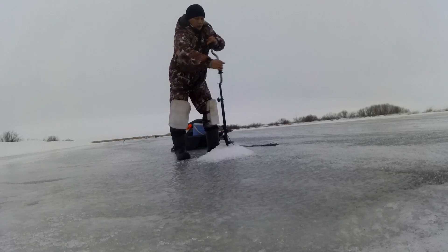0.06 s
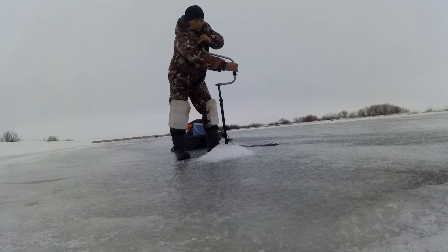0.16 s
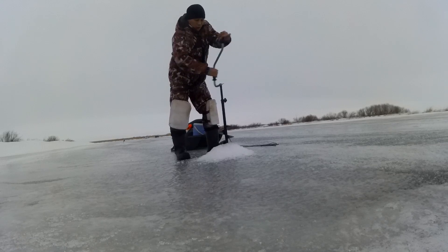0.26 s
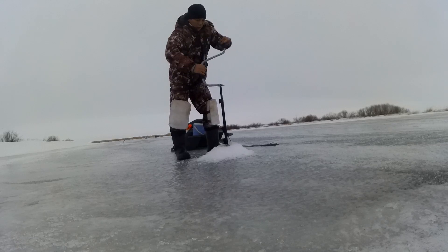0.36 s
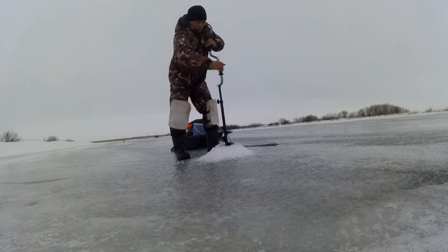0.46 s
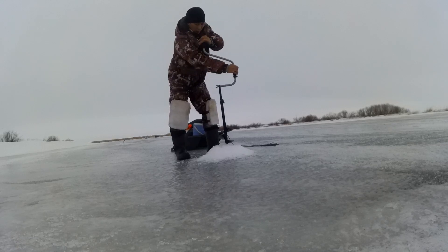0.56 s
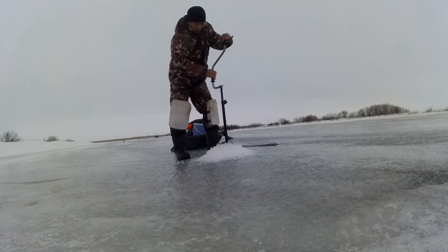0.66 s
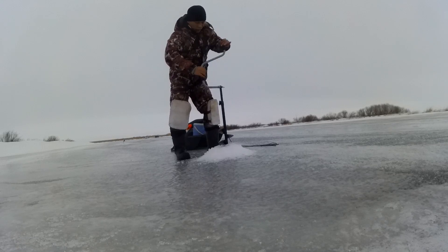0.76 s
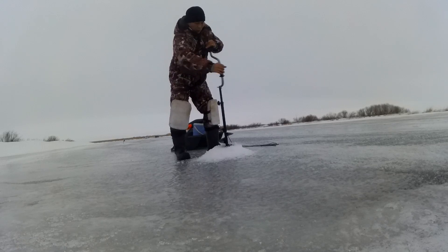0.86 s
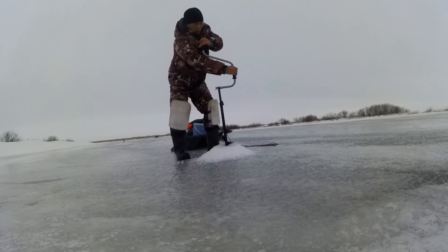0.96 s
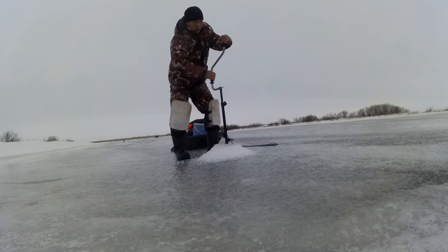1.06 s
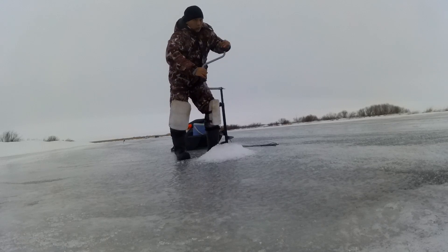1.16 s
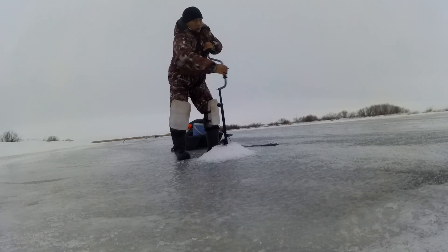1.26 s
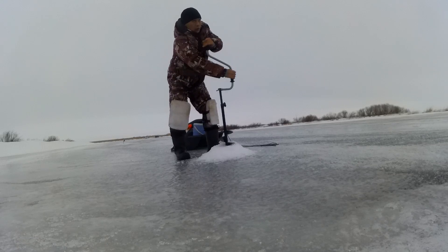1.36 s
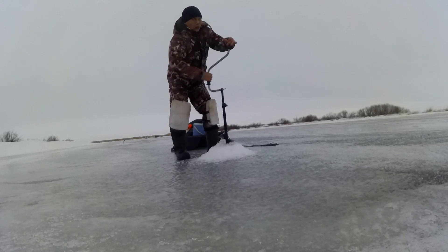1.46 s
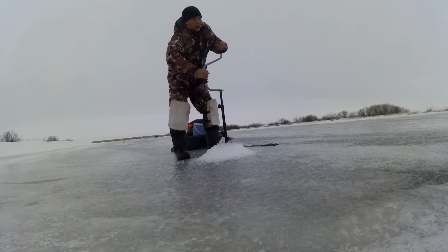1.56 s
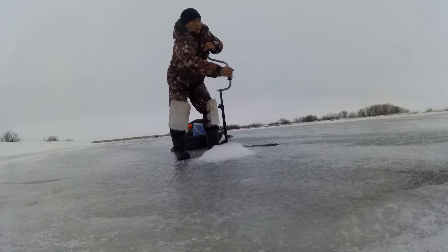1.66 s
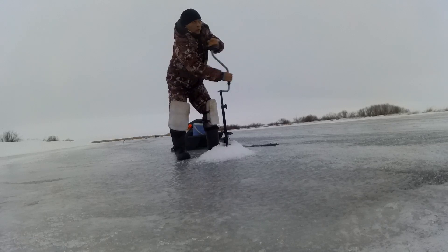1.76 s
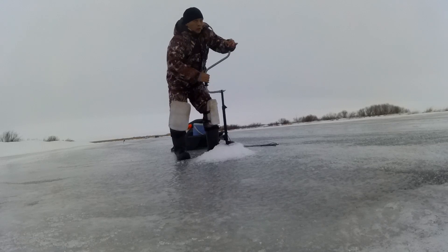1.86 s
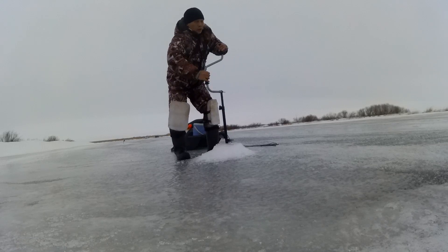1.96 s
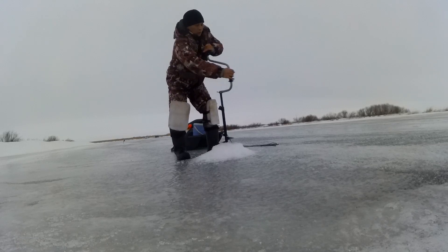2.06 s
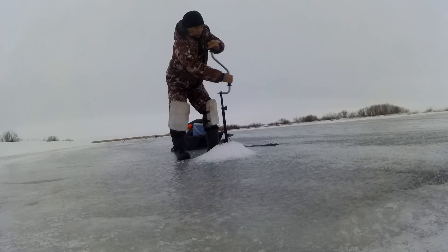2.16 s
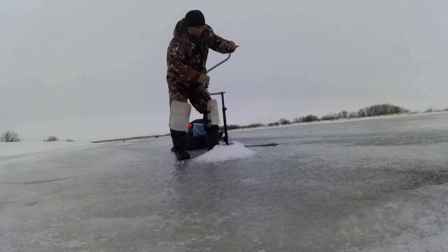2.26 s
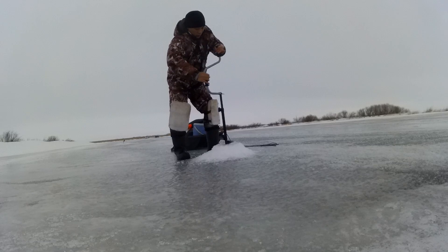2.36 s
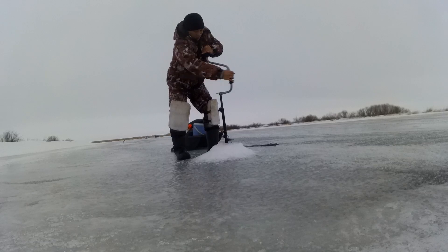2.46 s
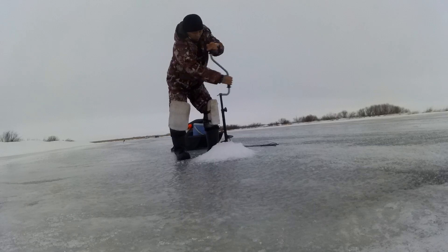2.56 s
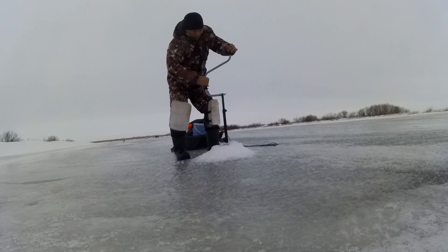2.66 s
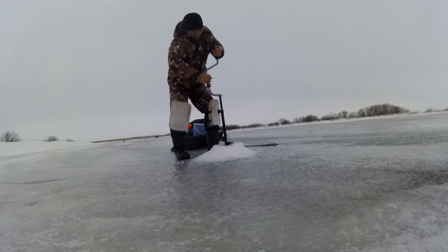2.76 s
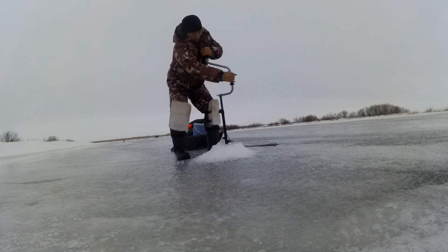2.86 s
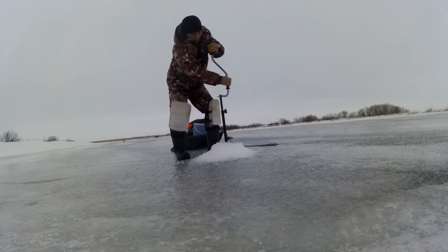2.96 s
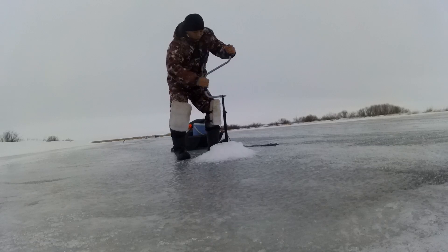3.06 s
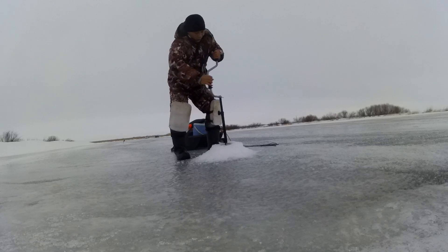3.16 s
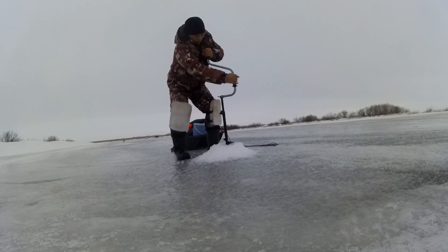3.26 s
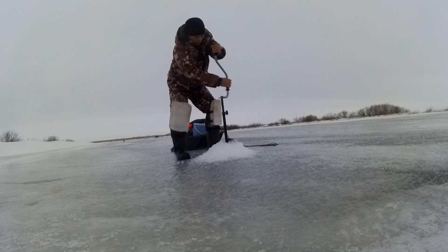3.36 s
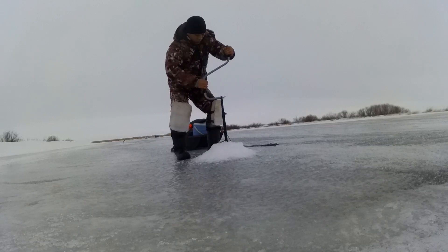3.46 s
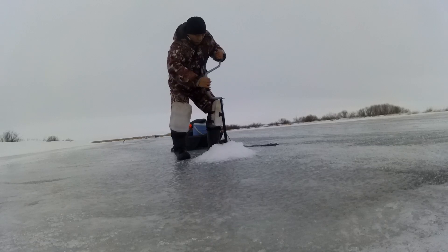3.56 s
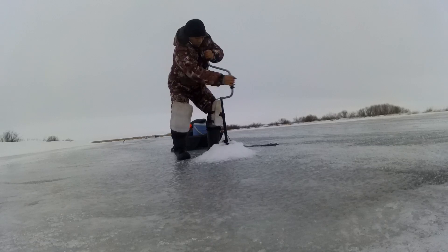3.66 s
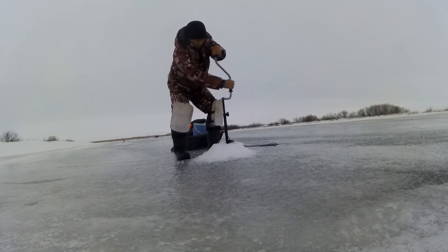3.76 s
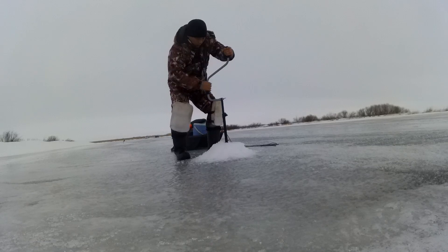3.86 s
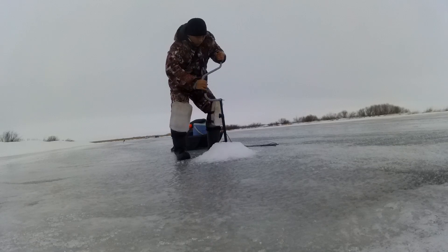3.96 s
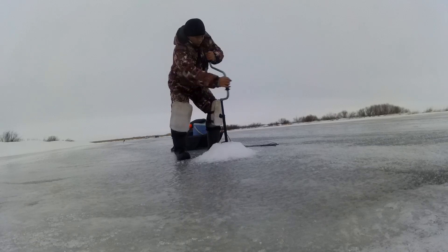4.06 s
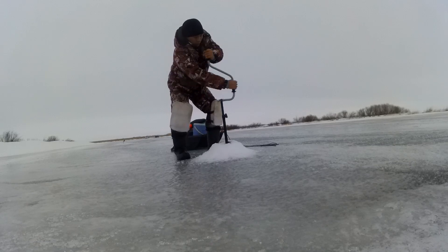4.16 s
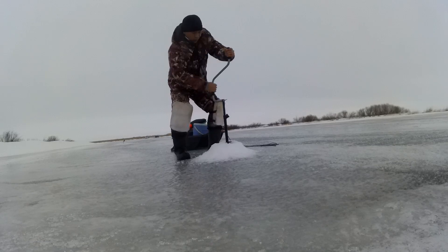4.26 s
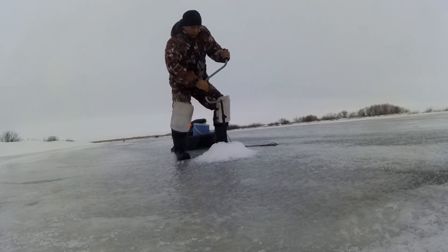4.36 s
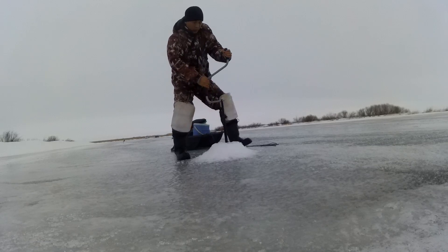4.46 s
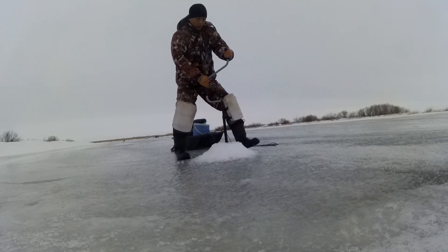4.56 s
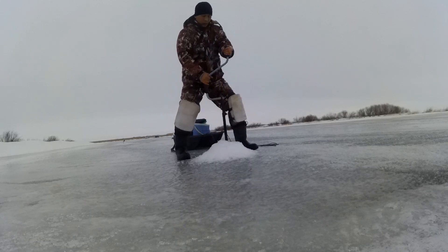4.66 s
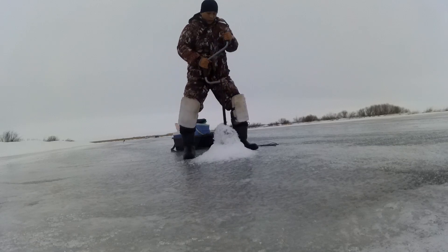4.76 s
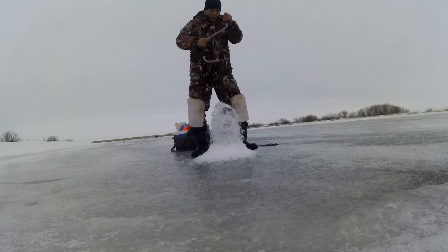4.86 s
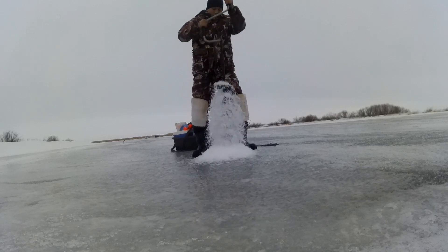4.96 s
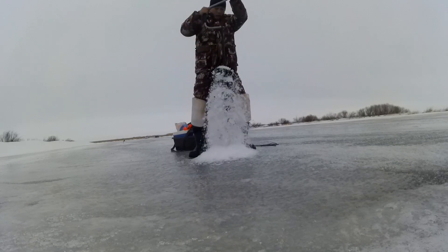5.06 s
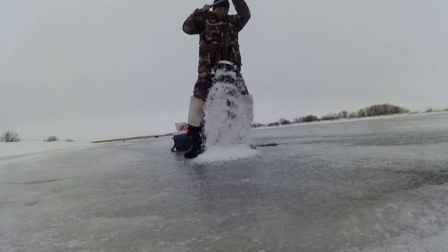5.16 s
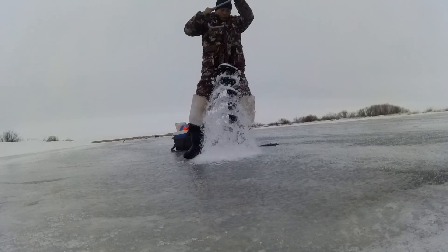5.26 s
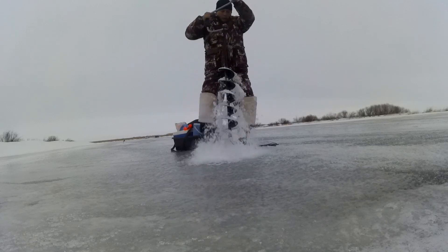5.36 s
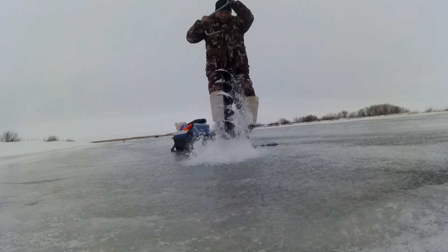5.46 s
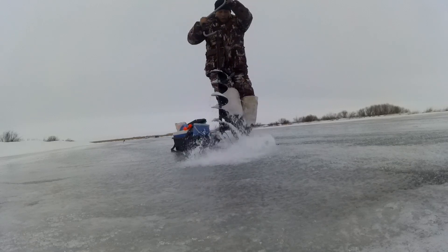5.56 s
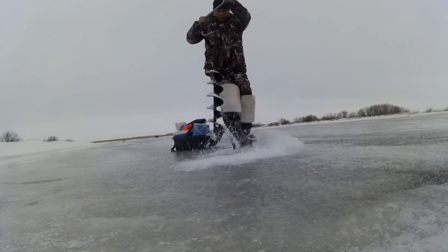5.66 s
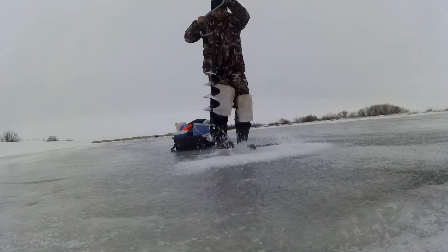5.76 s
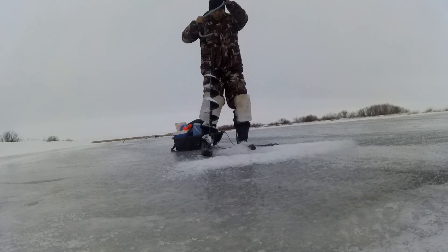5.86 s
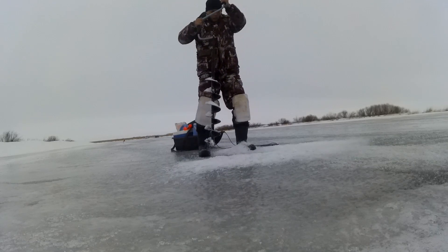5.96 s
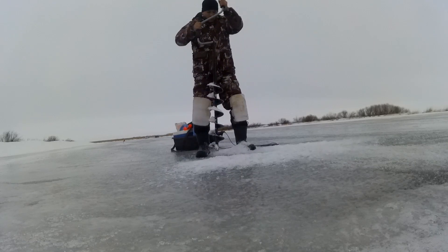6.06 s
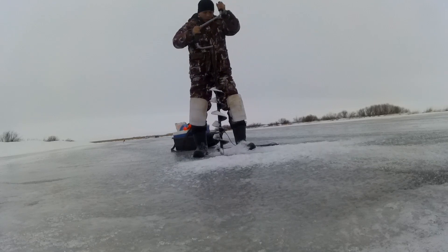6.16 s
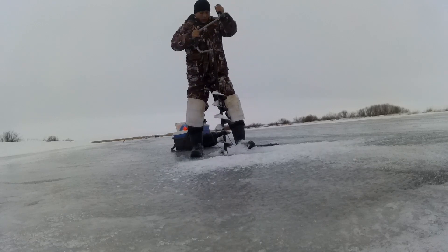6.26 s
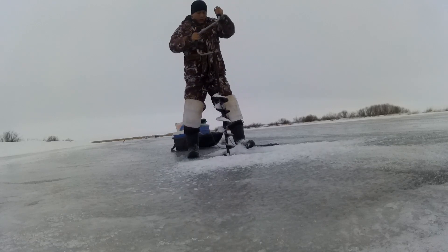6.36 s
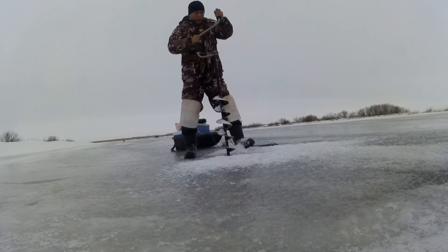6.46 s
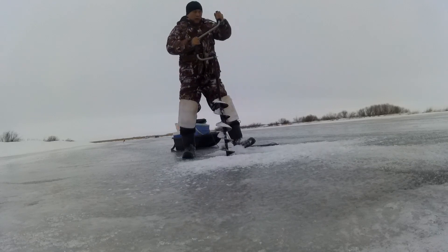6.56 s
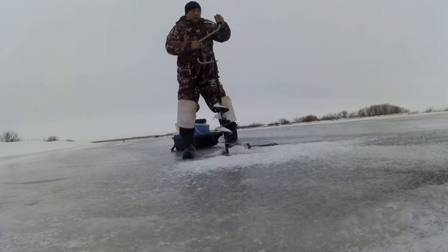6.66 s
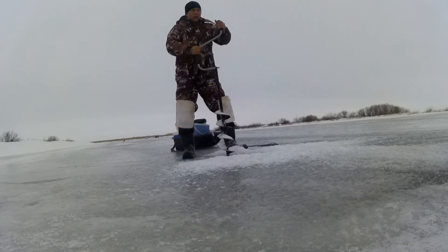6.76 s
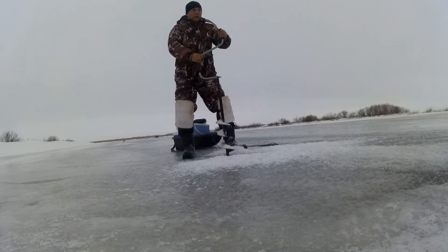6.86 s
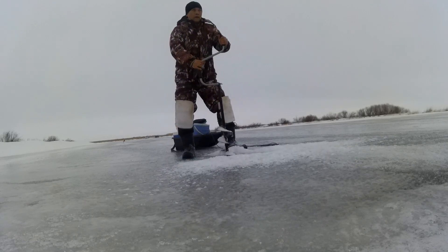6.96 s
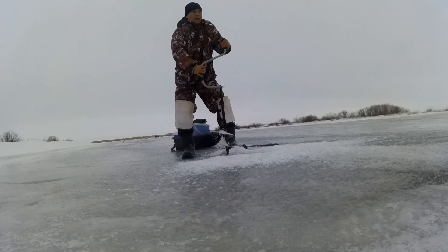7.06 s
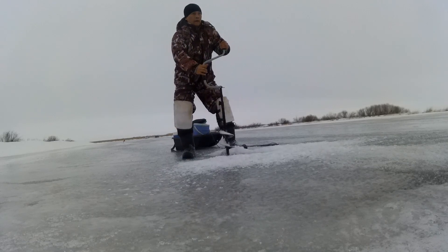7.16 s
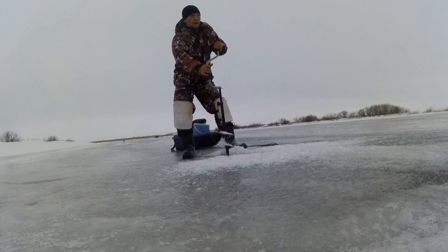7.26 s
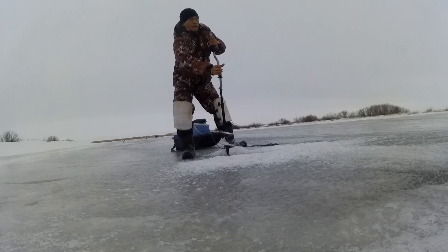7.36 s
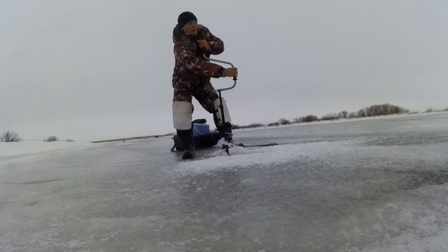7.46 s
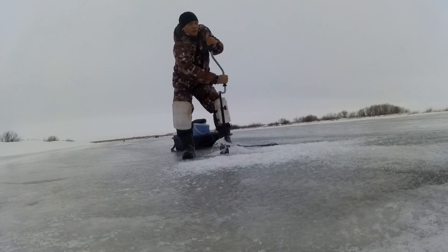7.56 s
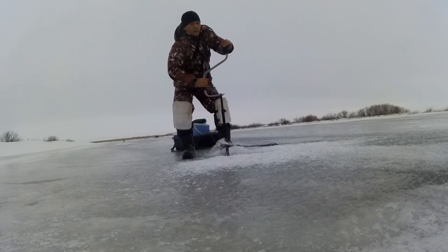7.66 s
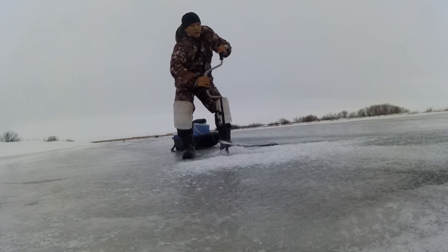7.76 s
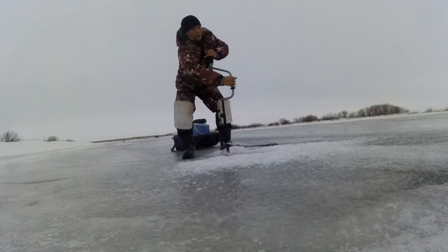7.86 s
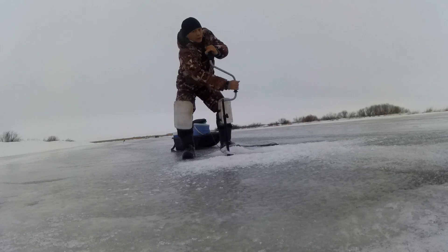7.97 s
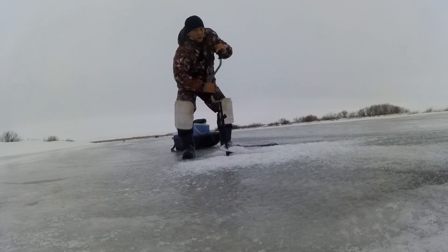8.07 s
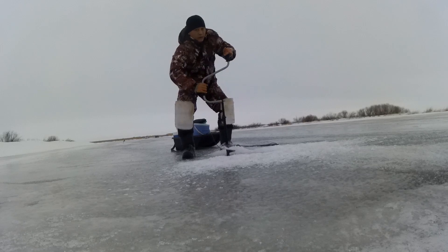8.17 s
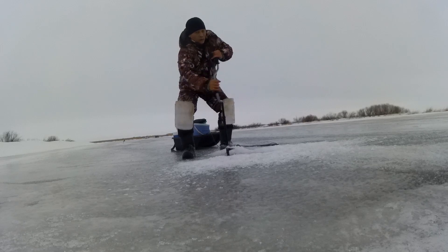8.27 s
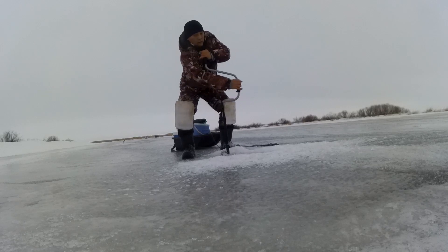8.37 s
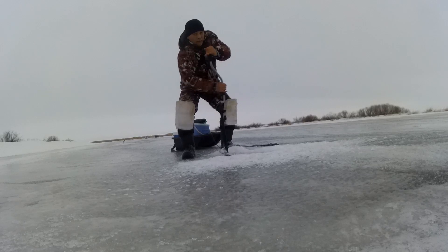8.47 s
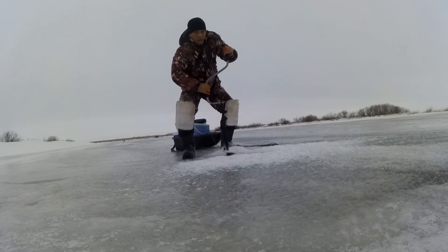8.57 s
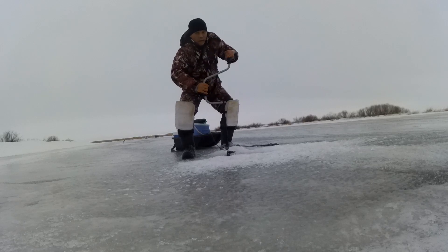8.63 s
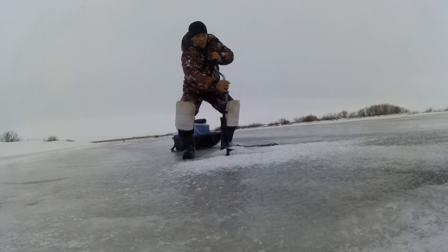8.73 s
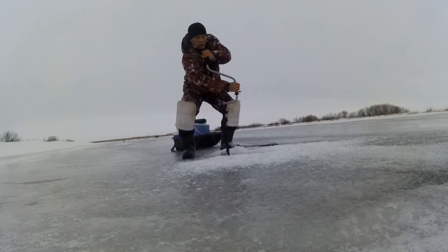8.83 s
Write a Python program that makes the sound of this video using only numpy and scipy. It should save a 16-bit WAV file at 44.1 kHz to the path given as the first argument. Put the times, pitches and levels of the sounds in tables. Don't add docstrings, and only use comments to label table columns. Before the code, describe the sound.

Muffled, ringing ice crunch from a hand drill, a clattering spill of shavings, sparse knocks and scrapes, then harder grinding starts again over faint wind.

```python
import sys
import numpy as np
from scipy import signal
from scipy.fft import rfft, irfft
from scipy.io import wavfile
from scipy.ndimage import uniform_filter1d

SR = 44100
rng = np.random.default_rng(int(sys.argv[2]) if len(sys.argv) > 2 else 0)


def field_ratio(decibels):
    return 10 ** (np.asarray(decibels, dtype=float) / 20)


def int16_out(signal):
    q = np.round(np.clip(np.atleast_2d(signal).T, -1, 1) * 32767)
    wavfile.write(sys.argv[1], SR, q.astype(np.int16))


N = 392445
HZ = np.fft.rfftfreq(N, 1 / SR) + 1e-3
TIME = np.arange(N) / SR
SLOW = TIME[::64]

# [f/Hz, width/Hz, level/dB]
SLAB = [(533, 115, 5), (639, 64, -5.5), (754, 37, -3)]
# [f/Hz, level/dB per Hz]
GRIT = [(500, -40), (850, 0.5), (1120, -9.5), (1250, -0.5), (1400, -4), (1600, -3.5), (1730, -6),
        (1950, -10.5), (2110, -36.5), (3000, -31.5), (3900, -60.5), (6600, -120)]
# [t/s, peak level/dB, f/Hz]
TICKS = [(6.041, -45.5, 685), (5.976, -44, 604), (6.112, -41, 560), (6.161, -45, 530), (6.274, -47, 520),
         (6.305, -39.5, 600), (6.333, -50, 484), (6.385, -48, 477), (6.42, -47, 556), (6.502, -48, 571),
         (6.556, -38, 610), (6.589, -46, 590), (6.659, -42, 590), (6.705, -29, 564), (6.802, -42, 714),
         (6.84, -39.5, 583), (6.958, -23.5, 564), (7.061, -30, 530)]
# [t/s, peak level/dB, f/Hz]
LUMPS = [(4.753, -32.5, 610), (4.773, -36, 540), (4.797, -29, 604), (4.813, -25.5, 555), (4.831, -27, 614),
         (4.842, -23.5, 644), (4.852, -37, 610), (4.863, -31, 570), (4.882, -16, 596), (4.896, -18, 620),
         (4.907, -23, 680), (4.952, -21.5, 594), (4.998, -38, 410), (5.077, -36, 487), (5.093, -42, 543),
         (5.109, -39, 484), (5.171, -48, 546), (5.202, -33.5, 556), (5.239, -28, 585), (5.276, -41, 420),
         (5.315, -36, 540), (5.374, -33.5, 502), (5.394, -32, 650), (5.404, -25, 586), (5.422, -35.0, 555),
         (5.438, -26, 654), (5.448, -27.5, 524), (5.468, -37, 600), (5.496, -24.5, 516), (5.529, -36, 507),
         (5.558, -33, 479), (5.576, -33, 510), (5.589, -29.5, 547), (5.625, -33, 563), (5.636, -32.5, 517),
         (5.666, -44, 495), (5.676, -36.5, 496), (5.769, -51, 555), (5.786, -44, 571)]
# [t/s, peak level/dB, f/Hz]
BUMPS = [(4.707, -31, 388), (5.968, -39, 500), (5.986, -44, 560), (5.995, -44.5, 430), (6.022, -48, 592),
         (6.119, -36, 577), (6.131, -45.0, 569), (6.18, -47, 541), (6.341, -49, 519), (6.432, -49, 527),
         (6.517, -45.5, 526), (6.534, -45, 590), (6.671, -37.5, 547), (6.689, -32, 506), (6.72, -43, 530),
         (6.73, -38.0, 434), (6.742, -38, 492), (6.762, -38, 583), (6.931, -27.5, 533), (6.983, -24.5, 583),
         (7.007, -25.5, 613), (7.03, -19.5, 556), (7.079, -24.5, 541), (7.122, -36, 600), (7.134, -40, 590),
         (7.15, -34, 627), (7.23, -38.5, 510), (7.311, -41, 542), (7.365, -39, 510), (7.403, -37.5, 500),
         (7.462, -36.5, 530), (7.599, -24, 500), (7.617, -21, 527), (7.759, -33, 560), (7.827, -38, 533),
         (7.87, -31, 520), (7.889, -46, 560), (8.0, -32, 560), (8.019, -25.5, 585), (8.038, -29.5, 593),
         (8.058, -22.5, 500)]
# [t/s, peak level/dB, f/Hz]
SNAPS = [(0.925, -19.5, 552), (1.598, -22.5, 514), (2.066, -25, 540), (2.265, -18.5, 534),
         (2.519, -23, 540), (8.207, -20, 540), (8.749, -20, 576), (2.439, -23.5, 556), (2.562, -18.5, 553),
         (2.584, -18.5, 566), (2.751, -18, 543), (3.192, -20.5, 508), (3.674, -21.5, 570),
         (3.902, -21.5, 540), (3.974, -20.5, 553), (4.251, -20, 538), (4.297, -18, 542), (8.801, -15, 567)]
# [t/s, peak level/dB, f/Hz]
OLD_HOLE_BITES = [(0.024, -21.5, 526), (0.144, -16.5, 533), (0.274, -22, 530), (0.313, -21, 527),
                  (0.33, -24.5, 522), (0.399, -24, 515), (0.51, -21.5, 525), (0.531, -26.5, 510),
                  (0.55, -21.5, 520), (0.676, -29, 517), (0.696, -25, 534), (0.72, -19, 530),
                  (0.806, -24.5, 532), (0.822, -23, 510), (0.88, -21.5, 534), (0.998, -29, 474),
                  (1.055, -26.5, 517), (1.079, -26, 494), (1.102, -21.5, 533), (1.154, -20, 534),
                  (1.181, -26, 534), (1.306, -23, 564), (1.321, -25, 490), (1.338, -21.5, 533),
                  (1.412, -22, 562), (1.45, -23.5, 524), (1.508, -22, 535), (1.66, -23.5, 560),
                  (1.705, -22, 600), (1.727, -23.5, 520), (1.777, -22.5, 555), (1.815, -20.5, 560),
                  (1.828, -29, 493), (1.972, -20.5, 557), (1.987, -23, 515), (2.01, -30, 498),
                  (2.028, -23.5, 542), (2.1, -22, 550), (2.18, -22.5, 550),
                  (2.372, -24, 513), (2.405, -29, 588), (2.471, -23, 577), (2.545, -21.5, 538),
              (2.623, -23.5, 510), (2.667, -20, 512), (2.777, -27, 533), (2.802, -25, 539),
              (2.872, -22.5, 512), (2.908, -23, 518), (2.923, -25.5, 540), (2.965, -24.5, 590),
              (3.024, -21.5, 546), (3.069, -17.5, 529), (3.103, -22.5, 560), (3.206, -20.5, 540),
              (3.264, -19, 535), (3.285, -19, 517), (3.303, -20, 521), (3.384, -22.5, 530),
              (3.446, -24, 583), (3.5, -26, 533), (3.552, -23.5, 510), (3.581, -26, 526), (3.62, -26, 523),
              (3.642, -27, 517), (3.698, -21, 512), (3.715, -24.5, 557), (3.864, -15, 522),
              (3.984, -32, 526), (4.039, -33, 556), (4.099, -19, 542), (4.11, -21.5, 497), (4.12, -25, 533),
              (4.236, -21.5, 500), (4.275, -27, 516), (4.31, -21, 557), (4.364, -25.5, 492),
              (4.391, -29.5, 523)]
# [t/s, peak level/dB, f/Hz]
FRESH_BITES = [(8.139, -20, 515), (8.159, -31.5, 545), (8.19, -25, 590), (8.224, -15, 507),
               (8.262, -20.5, 545), (8.287, -19, 522), (8.334, -17.5, 527), (8.362, -15.5, 518),
               (8.387, -14, 525), (8.418, -15.5, 542), (8.464, -16.5, 498), (8.489, -16.5, 555),
               (8.5, -16, 497), (8.516, -19.5, 578), (8.543, -18.5, 518), (8.556, -15.5, 574),
               (8.578, -16, 540), (8.594, -11.5, 547), (8.618, -21, 534), (8.648, -13, 537),
               (8.67, -21, 586), (8.715, -21, 556), (8.77, -14, 538), (8.789, -17, 582), (8.814, -28, 480),
               (8.831, -26, 527), (8.868, -18.5, 570), (8.892, -12.5, 528)]
BITES = OLD_HOLE_BITES + FRESH_BITES


def unit(x):
    return x / np.sqrt(np.mean(x ** 2))


def ring(x, modes, order=1):
    gain = sum(field_ratio(db) / (1 + 1j * (HZ - hz ** 2 / HZ) / width) ** order for hz, width, db in modes)
    return irfft(rfft(x) * gain, N)


def colour(x, table):
    hz, db = np.transpose(table)
    ceps = irfft(np.interp(np.log(HZ), np.log(hz), db) * np.log(10) / 20, N)
    ceps[1:N // 2] *= 2
    ceps[N // 2 + 1:] = 0
    return irfft(rfft(x) * np.exp(rfft(ceps)), N)


def walk(rate):
    k = int(SR / rate)
    held = np.repeat(rng.standard_normal(N // k + 1), k)
    slewed = uniform_filter1d(uniform_filter1d(held, k), k)
    return unit(slewed[:N])


def chips(rate, spread_db):
    when, size, sign = rng.random(N), rng.exponential(size=N), rng.standard_normal(N)
    soft = np.clip((rate / SR - when) * SR / 50 + .5, 0, 1)
    return soft * field_ratio(spread_db * size) * np.sign(sign)


def steady(x, span_s, share):
    local = np.sqrt(uniform_filter1d(x ** 2, int(span_s * SR)) + 1e-12)
    return unit(x / local ** np.clip(share, 0, 1))


def patchy(x, spread_db):
    cells = signal.stft(x, nperseg=1024)[2]
    field = uniform_filter1d(rng.standard_normal(cells.shape), size=3, axis=0)
    field = uniform_filter1d(field, size=4, axis=1)
    return signal.istft(cells * field_ratio(spread_db * unit(field)), nperseg=1024)[1][:N]


def per_sample(gain):
    return np.interp(TIME, SLOW, gain)


def swell(s, db, rise_s, fall_s):
    return field_ratio(2 * db - 40 * np.maximum((s - SLOW) / rise_s, (SLOW - s) / fall_s))


def stall(table, depth, span_s, late_s):
    blow_s = np.sort(np.array(table)[:, 0]) + late_s
    after = np.clip(np.searchsorted(blow_s, SLOW), 1, len(blow_s) - 1)
    gap = np.minimum(np.abs(blow_s[after] - SLOW), np.abs(SLOW - blow_s[after - 1]))
    return per_sample(1 - np.clip(depth, 0, 1) * np.exp(-(gap / span_s) ** 2))


def air():
    # [t/s, level/dB]
    gusts = [(3.3, -64), (3.7, -54.5), (4.4, -51.5), (4.52, -60.5), (4.86, -49.5), (5.11, -56), (5.26, -60),
             (6.02, -60.5), (6.18, -59), (6.34, -58.5), (7.64, -58), (7.72, -65), (8.2, -64)]
    # [f/Hz, level/dB per Hz]
    wind_shape = [(8.8, -32.5), (15, 1), (24, -11.5), (32, -10.5), (150, -25), (200, -53.5), (330, -120)]
    # [f/Hz, level/dB per Hz]
    lake_shape = [(71, -30), (120, 0.5), (289, -7.5), (331, -2.5), (845, -17), (2110, -20.5), (2300, -23.5),
                  (2990, -56.5), (5060, -120)]
    # [f/Hz, level/dB per Hz]
    hiss_shape = [(1290, -31), (2200, -6), (2440, -6), (3460, -7), (3690, -6), (6700, -8), (15100, -12)]
    gust_db = np.interp(TIME, *np.transpose(gusts)) + 1.2 * walk(5.6)
    wind = unit(colour(rng.standard_normal(N), wind_shape)) * field_ratio(gust_db)
    lake = unit(colour(rng.standard_normal(N), lake_shape)) * field_ratio(-66.5 + 1.5 * walk(10.0))
    hiss = unit(colour(rng.standard_normal(N), hiss_shape)) * field_ratio(-71.5)
    return wind + lake + hiss


def spray():
    # [t/s, level/dB, rise/s, fall/s]
    showers = [
        (4.87, -69.5, 0.16, 0.22),
        (5.43, -69.5, .2, 0.78),
        (5.8, -73, 0.94, 1),
        (6.958, -66, 0.02, 0.21),
    ]
    fizz = ring(chips(11000.0, 1.3), [(12800, 4500, -3.5), (9500, 1000, -12.5), (5550, 320, 9.0)], order=2)
    return unit(fizz) * per_sample(np.sqrt(sum(swell(*row) for row in showers)))


def plop():
    # [t/s, peak level/dB, decay/s]
    emptied = (4.99, -41, .035)
    s, db, decay_s = emptied
    t = np.maximum(TIME - s, 0)
    return field_ratio(db) * (1 - np.exp(-t / 0.0025)) * np.exp(-t / decay_s) * np.sin(2 * np.pi * 405. * t)


def contacts():
    pull = [
        (4.765, -37.5, 0.047, 0.076, -3),
        (4.84, -35, 0.078, 0.13, 3),
        (4.888, -26.5, 0.038, 0.03, -1.5),
        (4.95, -37, 0.058, 0.025, 6.5),
        (4.995, -54, 0.036, 0.037, 16),
        (6.83, -56.5, 0.14, 0.11, 12),
        (6.962, -33.5, 0.011, 0.11, 10),
        (7.036, -39, .15, 0.011, 7.5),
        (7.07, -31, 0.096, 0.027, -3),
    ]
    spill = [
        (5.1, -54.5, 0.055, 0.14, 5),
        (5.375, -45, 0.03, 0.47, 0),
        (5.47, -43.5, 0.16, 0.21, 0),
        (5.59, -42, 0.5, 0.056, -7),
        (5.8, -69, 0.43, 0.67, 13),
        (5.976, -56, 0.045, 0.29, 1.5),
        (6.115, -52, 0.013, 0.16, -3),
        (6.33, -63.5, 0.54, 0.27, 4.5),
        (6.508, -56.5, 0.14, 0.2, 4.5),
    ]
    steps = [
        (6.726, -40.5, 0.077, 0.06, 0.34),
        (6.9, -76, 0.48, 0.073, -1),
    ]
    seat = [
        (7.13, -41, 0.09, 0.08, -12),
        (7.3, -53, .4, 0.35, -10),
        (7.52, -55.5, 0.32, 0.22, 7.5),
        (7.605, -37, 0.054, 0.088, 3),
        (7.685, -37, 0.44, 0.015, -15),
        (7.85, -40, 0.28, 0.38, -0.5),
        (8.01, -35, 0.067, 0.34, 3),
        (8.15, -40, 0.056, 0.045, 1),
    ]
    grazes = [
        (4.692, -61.5, 0.0055, 0.054, 0),
        (4.708, -62.5, 0.0107, 0.032, 0),
        (6.85, -66, 0.059, 0.02, 0.0011),
    ]
    kinds = [(pull, (6.5, -10, -14, -28)), (spill, (0, -3.5, -10.5, -21.5)), (steps, (6.5, 0.5, -4, -41)),
             (seat, (2.5, -10.5, -21, -38)), (grazes, (3, 11, 4, 0.85))]
    sharp_share = (0.16, 0.058, 1.11, 1.29)
    gains = []
    for k, share in enumerate(sharp_share):
        power = sum(swell(s, db + mix[k] + share * sharp_db, rise_s, fall_s)
                    for rows, mix in kinds for s, db, rise_s, fall_s, sharp_db in rows)
        gains.append(per_sample(np.sqrt(power)))
    return gains


def moves():
    # [f/Hz, width/Hz, level/dB]
    thud_modes = [(385.6, 64, 1), (244, 257, -3.5), (118, 154, 0)]
    # [f/Hz, width/Hz, level/dB]
    bare_modes = [(545, 64, 4.5), (753, 156, -8.5), (405, 93, -9.5)]
    # [f/Hz, width/Hz, level/dB]
    scrape_modes = [(2720, 750, -5.5), (3150, 360, -4), (3800, 300, 1), (4350, 380, 0.5), (4560, 210, -8),
                    (5470, 400, -6.5), (6200, 470, -2.5), (6900, 500, -10)]
    # [f/Hz, width/Hz, level/dB]
    blade_modes = [(2900, 1100, -9.5), (3180, 250, -5), (4270, 340, 2.5), (4530, 280, 1.5),
                   (5400, 930, -14.5), (6330, 470, 0), (6960, 340, -12.5)]
    out_of_hole_s, set_down_s, seated_s = 6.6, 6.9, 7.2
    slab, thud, crunch, scrape = contacts()
    slip = np.clip(walk(60.), -2.5, 1.2)
    give = stall(LUMPS + BUMPS + TICKS, 0.85, 0.0033, 0.0034)
    coarse = chips(900., 2.6) * field_ratio(6.5 * slip)
    fine = chips(3000., 1.9) * field_ratio(2.0 * slip)
    under_lumps = steady(patchy(ring(coarse, SLAB, order=2), 4.0), 0.036, 0.78)
    under_blades = steady(ring(coarse + fine, bare_modes, order=2), 0.025, 0.86)
    slab = slab * np.where(TIME < seated_s, under_lumps, under_blades) * field_ratio(-3.0) * give
    boots = (TIME > out_of_hole_s) & (TIME < set_down_s)
    boot_thud = steady(ring(coarse + fine, thud_modes[:-1], order=2), 0.027, 0.19)
    full_thud = steady(ring(coarse + fine, thud_modes, order=2), 0.027, 0.19)
    thud = thud * np.where(boots, boot_thud, full_thud)
    crunch = crunch * steady(patchy(colour(fine + 0.26 * coarse, GRIT), 4.0), 0.065, 0.37)
    rub = chips(8000., 2.0) * field_ratio(2.0 * slip)
    on_wall = unit(ring(rub, scrape_modes, order=2))
    on_bare_ice = unit(ring(rub, blade_modes, order=2))
    scrape = scrape * np.where(TIME < out_of_hole_s, on_wall, on_bare_ice)
    return slab + thud + (crunch + scrape) / (give + 0.29) ** 0.15


def knocks(table, grit, crack_db, rise_s, fall_s, crack_s, heft, click):
    out, t = np.zeros(N + 2048), np.arange(2048) / SR
    for s, db, hz in table:
        i = int(s * SR)
        weight = field_ratio(heft * (db + 23.0))
        shape = (1 - np.exp(-t / rise_s / weight)) ** 2 * np.exp(-t / fall_s / weight)
        crack = field_ratio(crack_db - 4.0) * grit[i % (N - 2048):][:2048]
        crack = crack * (1 - np.exp(-t * 3000)) * np.exp(-t / crack_s)
        out[i:i + 2048] += field_ratio(db) * (crack - click - shape / shape.max() * np.sin(2 * np.pi * hz * t))
    return out[:N]


def bites(table, grit, crack_db, build_s, load_s, free_s, heft, edge=0.92):
    # [f/Hz, level/dB]
    overtone = (1253, -27.5)
    out, t = np.zeros(N + 4096), np.arange(-1024, 1024) / SR
    for s, db, hz in table:
        i = int((s + build_s) * SR)
        length_s = np.where(t < 0, load_s, free_s) * field_ratio(heft * (db + 12.5))
        shape = np.exp(-np.abs(t / length_s) ** edge)
        crack = field_ratio(crack_db) * grit[i % (N - 2048):][:2048]
        second_hz = overtone[0] + hz - SLAB[0][0]
        second = field_ratio(overtone[1]) * np.cos(2 * np.pi * second_hz * t)
        out[i:i + 2048] += field_ratio(db) * shape * (crack + np.sin(2 * np.pi * hz * t) + second)
    return out[1024:N + 1024]


def shards(grit):
    # [t/s, peak level/dB, f/Hz]
    pings = [(4.892, -32, 1240), (4.957, -39, 1244), (6.046, -50.5, 1650), (6.508, -52, 1800),
             (6.585, -59, 1300), (6.625, -60, 1290), (6.666, -45, 1260), (7.385, -58, 1600),
             (8.165, -35, 1280), (8.19, -32, 1330), (8.578, -28, 915), (8.582, -39, 1220),
             (8.604, -26, 910), (8.612, -34, 1256)]
    return bites(pings, grit, -18, 0, 0.0026, 0.0049, 0)


def blows(grit):
    click = colour(signal.unit_impulse(N), GRIT)[:2048]
    click = click / np.abs(click).max()
    ticks = knocks(TICKS, grit, -7, 0.00067, 0.0062, 0.0048, 0.45, field_ratio(-4.5) * click)
    snaps = knocks(SNAPS, grit, -31, 0.0018, 0.004, 0.0048, 0.27, field_ratio(-24.5) * click)
    lumps = bites(LUMPS, grit, -25.5, 0.00211, 0.002, 0.0046, 0.23, edge=1.57)
    bumps = bites(BUMPS, grit, -31, 0.00199, 0.0054, 0.0074, 0.35)
    return ticks + snaps + lumps + bumps


def cutting():
    # [t/s, level/dB]
    pressure = [
        [(0, 1), (4.32, 1), (4.42, -2.5), (4.47, -48)],
        [(8.1, -45), (8.144, -7), (8.284, -5.5), (8.644, 2), (8.696, -7), (8.8, 0), (8.9, 1.5)],
    ]
    hole_mix = [
        (-35, -40, -44.5, -62.5),
        (-23, -40.5, -39.5, -62),
    ]
    deeper_db_per_s = [
        (0, 0, -1.18, -0.54),
        (0, 1.5, -0.21, 0.86),
    ]
    pressure_share = (0.84, 0.51, 0.67, 0.51)
    push_share = (0.55, 0.16, 0.84, 0.63)
    # [t/s, extra level/dB, length/s]
    pushes = [(0.795, 6.5, 0.029), (0.31, 6.5, 0.064), (0.677, 10, 0.033), (1.064, 4.5, 0.047),
              (1.202, 4.5, 0.066), (1.48, 6.5, 0.11), (1.84, 7.5, 0.044), (2.234, 3.5, 0.22),
              (2.636, 5, 0.11), (2.976, 6, 0.09), (3.21, 2.5, 0.19), (3.42, 6, 0.074), (3.862, 7, 0.059),
              (4.08, 3, 0.11), (4.254, 4, 0.078), (8.604, -5, 0.036)]
    # [t/s, hum level/dB]
    clear = [(0, 6), (.1, -7.5), (.66, 4), (1, 2), (1.4, 4.5), (1.85, 3.5), (2.45, 0.5), (2.8, 0),
             (3.6, -2), (4.4, -6), (8.1, 1.5), (8.7, 3.5), (8.82, 10)]
    push_db = sum(db * np.exp(-((SLOW - s) / length_s) ** 2) for s, db, length_s in pushes)
    gains = np.zeros((4, len(SLOW)))
    for weight, mix, deeper in zip(pressure, hole_mix, deeper_db_per_s):
        weight_db = np.interp(SLOW, *np.transpose(weight), left=-300, right=-300)
        layer_db = np.c_[list(mix)] + np.outer(deeper, SLOW - weight[0][0])
        gains += field_ratio(layer_db + np.outer(pressure_share, weight_db) + np.outer(push_share, push_db))
    gains[1] *= field_ratio(np.interp(SLOW, *np.transpose(clear)))
    return map(per_sample, gains)


def auger():
    # [f/Hz, width/Hz, level/dB]
    sheet_modes = [(530.1, 97.5, 7.5), (573.6, 133, 1.5), (483, 160, -3), (662, 350, -18.5)]
    # [f/Hz, width/Hz, level/dB]
    hole_modes = [(402.7, 33.4, 0), (363, 13, -6)]
    # [f/Hz, level/dB per Hz]
    crunch_shape = [(400, -14.5), (680, 3.5), (715, -0.5), (784, 1), (1010, -4), (1130, -12), (1250, -3),
                    (1390, -8.5), (1690, -7.5), (2070, -22.5), (2630, -43), (2820, -41.5), (3000, -29),
                    (3900, -74), (6600, -120)]
    # [f/Hz, width/Hz, level/dB]
    steel_modes = [(2550, 860, 6.5), (3194, 300, 9.5), (3738, 170, 14.5), (3877, 150, 13.5),
                   (4400, 820, 7.5), (5600, 720, 9), (5970, 400, 8), (7180, 360, 2), (8600, 1300, -11.5)]
    # [f/Hz, level/dB per Hz]
    rumble_shape = [(24, -43.5), (40, -20), (91, 1), (231, -3), (340, -1.5), (440, -31.5), (750, -120)]
    sheet, hole, crunch, steel = cutting()
    feed = walk(30.)
    big = chips(1200., 2.47) * field_ratio(2.8 * feed)
    fine = chips(4000., 1.99) * field_ratio(0.61 * feed + 0.68 * walk(60.))
    sheet = sheet * steady(ring(big, sheet_modes, order=3), 0.024, 0.67) * field_ratio(-0.5)
    sheet = sheet * stall(BITES + SNAPS, 0.49, 0.0063, 0.0043) * stall(SNAPS, 0.6, 0.006, -0.003)
    hole = hole * steady(ring(big + 0.72 * fine, hole_modes, order=2), 0.044, 0.2)
    crunch = crunch * steady(patchy(colour(fine + 0.21 * big, crunch_shape), 3.03), 0.14, 0.74)
    shaft = unit(patchy(ring(chips(9000., 1.3) * field_ratio(1.1 * feed), steel_modes, order=2), 3.2))
    rumble = unit(colour(chips(900., 1.8) * field_ratio(1.0 * feed), rumble_shape)) * field_ratio(17.5)
    return sheet + hole + crunch + steel * (shaft + rumble)


def scene():
    grit = unit(colour(rng.standard_normal(N), GRIT))
    background = air() + spray() + plop()
    handling = moves() + shards(grit) + blows(grit)
    blades = bites(BITES, grit, -36.5, 0.005296, 0.0074, 0.0078, 0.21, edge=1.2)
    return (background + handling + blades + auger())[None]


def top_cut(x):
    return signal.sosfilt(signal.butter(12, 15050, fs=SR, output="sos"), x)


def record(dry):
    return top_cut(dry)


dry = scene()
out = record(dry)
int16_out(out)
```